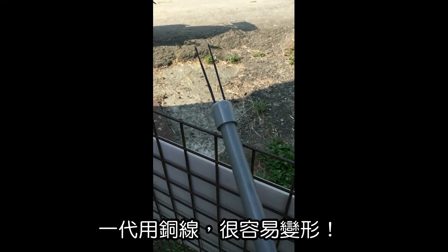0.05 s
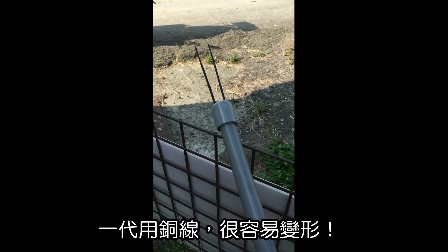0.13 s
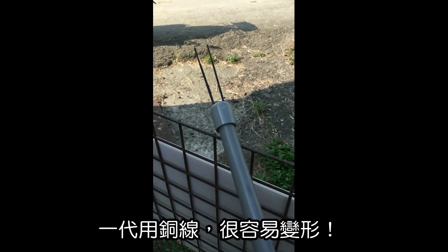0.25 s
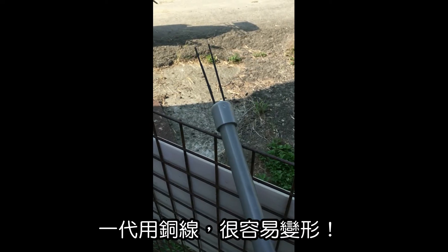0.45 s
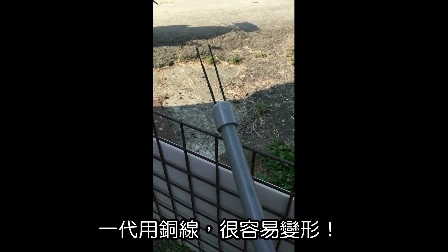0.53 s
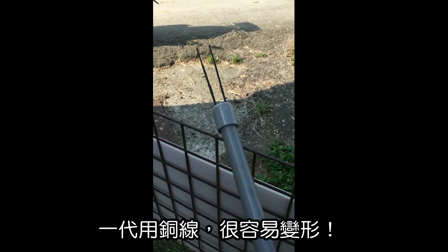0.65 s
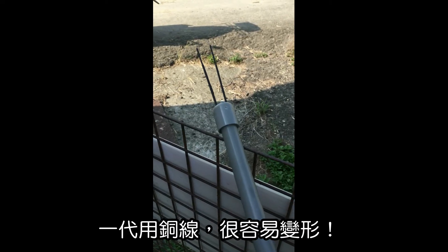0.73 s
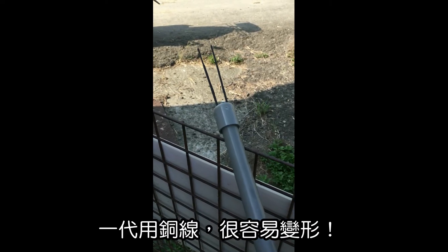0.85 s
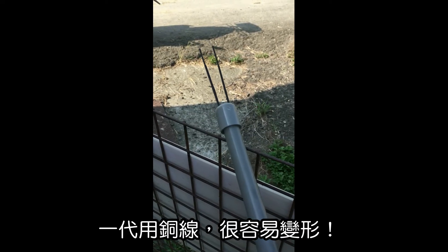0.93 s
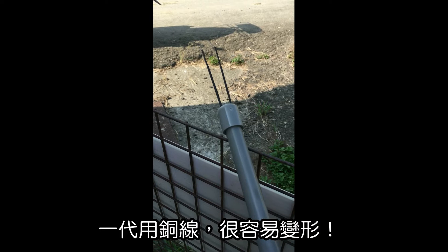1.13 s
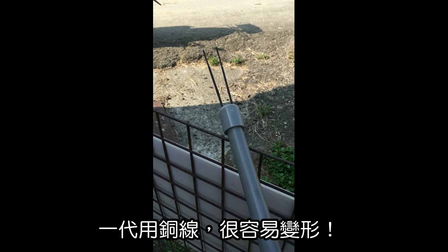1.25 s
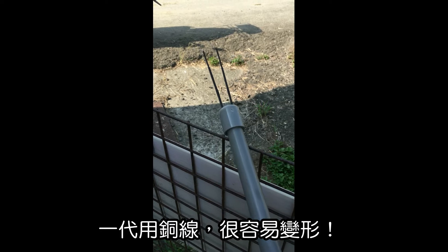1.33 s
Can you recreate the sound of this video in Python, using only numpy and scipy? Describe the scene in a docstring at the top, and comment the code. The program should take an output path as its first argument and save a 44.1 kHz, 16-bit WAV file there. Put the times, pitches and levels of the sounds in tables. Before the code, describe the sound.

Rapid electric sparks snap between the prongs of a handheld prod, loud and close enough to overload the microphone. The brief buzz stops, and light wind outdoors, faint rustling and one soft, low thud on the grip follow.

```python
"""High-voltage prod, outdoors

An arc crosses two prongs for half a second, close to the microphone. Sparks jump in bursts of two to
four, about 22 bursts a second: each a sharp crack with a low thump that overloads the microphone.
Cracks leave a short bright tail. Wind rumbles, two faint rustles follow, the hand bumps the grip once."""
import sys
import numpy as np
from scipy.fft import rfft, irfft, next_fast_len
from scipy.io import wavfile

SR = 44100
rng = np.random.default_rng(int(sys.argv[2]) if len(sys.argv) > 2 else 0)


def unload_wav(signal):
    """Save mono or channel-first audio to the path in sys.argv[1] as 16-bit WAV at rate SR, clipped to [-1, 1]."""
    wavfile.write(
        sys.argv[1],
        SR,
        np.round(np.clip(np.atleast_2d(signal).T, -1, 1) * 32767).astype(np.int16),
    )


N = 61739

# Sparks: t/s, relative crack level/dB, thump strength (+ push, - pull)
SPARK_EVENTS = [(0.1883, -30.5, -0.5), (0.1981, -25.5, -1.5), (0.2116, -3, -75.5), (0.2211, 1.5, 98.5),
                (0.2335, 0, -50), (.2560, 1, 57), (0.2655, 1, 11.5), (0.2869, -0.5, -36.5),
                (0.2966, -0.5, 50), (0.306, -1.1, -4), (.3173, -0.4, -75), (0.342, 1.6, 11),
                (.3515, 1.5, 25.5), (0.3623, -0.5, -43), (0.3862, 3.9, 0.5), (0.3967, 0, 8.5),
                (.4098, -0.5, -22), (0.4364, 2, 42), (0.4447, -1, -73), (0.4763, 0.5, 68),
                (0.4845, 5.5, -81), (.4942, -0.5, 55), (.5229, -0.4, -100), (0.5314, 1.5, 32),
                (0.5409, -1.5, 13.5), (0.5662, -0.8, -1.5), (.5752, -1.5, 81.5), (0.585, 0.5, -91.5),
                (.6120, 3.5, 34.5), (0.6221, 0, -70), (.6546, 3, 47), (.6635, -3, 45.5)]
# Crack spectrum: f/Hz, level/dB
CRACK_SPECTRUM = [(40, 7.5), (130, 18.5), (400, 17.5), (800, 17.5), (1400, 14.5), (2300, 13.5),
                  (3300, 11.5), (4800, 9), (5900, 13), (8200, 6), (10400, -11), (12900, 5), (15800, -13.5)]
# Sizzle of the charged air: f/Hz, level/dB
SIZZLE_SPECTRUM = [(300, 1.5), (1500, -2.5), (2850, -2.5), (3150, -3), (3500, -8), (7000, -4), (10500, -8),
                   (13000, -8.5), (15800, -9.5)]
# Ignition sputter: f/Hz, level/dB
SPUTTER_SPECTRUM = [(60, -13), (160, 0.5), (350, -1), (680, -9), (850, -25), (2000, -21), (6000, -58.5)]
# Echoes off nearby surfaces: delay/s, treble level/dB
ECHO_TAPS = [(.00315, -24), (.00656, -20)]
# Short bright tail after each crack, with a thin ring near 3.2 kHz: f/Hz, level/dB
TAIL_SPECTRUM = [(100, -1.5), (500, 0.5), (2800, -8), (3160, 8), (3600, -1), (7000, -4.5), (10500, 15.5),
                 (12900, 2.5), (15500, 4)]
# Microphone dips: f/Hz, width/Hz, depth (0-1)
MIC_DIPS = [(799, 170, 0.4), (2815, 330, 0.4)]
# Rustle peaks: t/s, level/dB
RUSTLE_PEAKS = [(1.08, -60), (1.18, -71)]
# Rustle spectrum: f/Hz, level/dB
RUSTLE_SPECTRUM = [(500, -25), (1500, -10.5), (2050, 3), (2800, -14), (3600, -6), (4200, -15), (5100, -20),
                   (5800, -18), (6800, -39)]
# Wind rumble: f/Hz, level/dB
WIND_SPECTRUM = [(20, -21), (45, -7.5), (68, 3.5), (110, -9.5), (180, -11.5), (300, -33.5), (700, -47),
                 (2000, -93)]
# Wind gusts: t/s, level/dB
WIND_ENVELOPE = [(0, -47), (.08, -49), (0.121, -40.5), (0.181, -45), (.7, -56), (.76, -42.5), (0.801, -52),
                 (.845, -81), (0.876, -39), (0.959, -42), (1.002, -54.5), (1.1, -46), (1.2, -57),
                 (1.34, -48), (1.39, -40)]
# Distant hush: f/Hz, level/dB
HUSH_SPECTRUM = [(100, -0.5), (300, -3.5), (600, -4.5), (1200, -9), (2300, -14.5), (4000, -28.5),
                 (7000, -42.5), (15000, -43.5)]
# Hush over time: t/s, level/dB
HUSH_ENVELOPE = [(0, -58.5), (0.031, -56), (0.04, -50), (.18, -53), (.7, -70.5), (.83, -68.5), (.95, -66),
                 (1.03, -60), (1.13, -60.5), (1.25, -56), (1.4, -56)]
# Microphone self-noise: f/Hz, level/dB
HISS_SPECTRUM = [(500, 3), (4000, -0.5), (9000, -5.5), (16000, -16.5)]


def sparks(crack_db=1, tint_sd_db=1.5, thump_corner_hz=128.5, thump_top_hz=734):
    """Each spark is one pressure impulse: a crack of varying colour plus a low push or pull."""
    size, lead = 8192, 256  # samples: window, room before the spark
    hz = np.fft.rfftfreq(size, 1 / SR)
    response, mic = echoes_and_tail(hz), microphone(hz)
    knots_hz = np.linspace(0, SR / 2, 9)
    fade = np.clip(2 * np.linspace(1, -1, size) + 1, 0, 1)
    thump = 1 / (1 + 1j * hz / thump_corner_hz) / (1 + (hz / thump_top_hz) ** 16)
    out = np.zeros(N + size)
    for at_s, level_db, push in SPARK_EVENTS:
        tint_db = np.interp(hz, knots_hz, tint_sd_db * rng.standard_normal(len(knots_hz)))
        crack = minimum_phase(log_interp(CRACK_SPECTRUM, hz) + tint_db) * amp(crack_db + level_db)
        pulse = irfft((crack * response + push * thump) * mic)
        start = round(at_s * SR) - lead
        out[start:start + size] += fade * np.roll(pulse, lead)
    return out[:N]


def sizzle(on_s=0.207, off_s=0.672, level_db=-41.5, rise_db_per_s=1299, fall_db_per_s=908):
    """Air sizzles steadily while the prongs are charged."""
    t = np.arange(N) / SR
    ramps_db = np.minimum((t - on_s) * rise_db_per_s, (off_s - t) * fall_db_per_s)
    gate = amp(np.minimum(0, ramps_db))
    return gate * noise(SIZZLE_SPECTRUM, [(0, level_db)])


def sputter():
    """Low sputter as the arc ignites."""
    return swell(SPUTTER_SPECTRUM, peak_s=0.22, peak_db=-16.5, fade_db_per_s=752.5)


def echoes_and_tail(hz, tail_db=-17, t60_s=0.054, echo_highpass_hz=6000):
    """Direct path, two bright echoes and a short bright tail with a thin ring near 3.2 kHz."""
    t = np.arange(2 * len(hz) - 2) / SR
    decay = rng.standard_normal(len(t)) * amp(-60 * t / t60_s)
    tail = rfft(decay / np.linalg.norm(decay)) * amp(tail_db + log_interp(TAIL_SPECTRUM, hz))
    echoes = sum(amp(db) * np.exp(-2j * np.pi * hz * delay_s) for delay_s, db in ECHO_TAPS)
    return 1 + tail + echoes * 1j * hz / (echo_highpass_hz + 1j * hz)


def microphone(hz, resonance_hz=58.3, q=1.87, bass_lag_hz=320.6, treble_lag_hz=8120):
    """Resonant high-pass with two dips. Lows lag highs, so impulses chirp downward."""
    s = 1j * hz
    response = s * s / (s * s + s * resonance_hz / q + resonance_hz ** 2)
    for centre_hz, width_hz, depth in MIC_DIPS:
        response *= 1 - depth * s * width_hz / (s * s + s * width_hz + centre_hz ** 2)
    bass_allpass = ((bass_lag_hz - s) / (bass_lag_hz + s)) ** 3
    treble_allpass = (treble_lag_hz - s) / (treble_lag_hz + s)
    return response * bass_allpass * treble_allpass


def hand_bump(at_s=1.374, gain_db=12.5, rolloff_hz=446):
    """Soft push on the grip; the microphone turns it into a low, falling thud."""
    hz = grid_hz()
    push = amp(gain_db) * np.exp(-(hz / rolloff_hz) ** 2)
    delay = np.exp(-2j * np.pi * hz * at_s)
    return irfft(push * delay * microphone(hz))[:N]


def rustles():
    """Brief, faint rustles after the arc."""
    return sum(swell(RUSTLE_SPECTRUM, at_s, db, fade_db_per_s=233.5) for at_s, db in RUSTLE_PEAKS)


def background(hiss_db=-76.5):
    """Light wind on the microphone, distant hush, self-noise."""
    wind = noise(WIND_SPECTRUM, WIND_ENVELOPE)
    hush = noise(HUSH_SPECTRUM, HUSH_ENVELOPE)
    hiss = noise(HISS_SPECTRUM, [(0, hiss_db)])
    return wind + hush + hiss


def swell(spectrum, peak_s, peak_db, fade_db_per_s):
    """Noise rising to a peak and falling at the same rate."""
    envelope = [(t, peak_db - fade_db_per_s * abs(t - peak_s)) for t in (0, peak_s, N / SR)]
    return noise(spectrum, envelope)


def noise(spectrum, envelope):
    """Coloured noise; the envelope (t/s, level/dB) sets its RMS."""
    hz = grid_hz()
    white = rng.standard_normal(2 * len(hz) - 2)
    coloured = irfft(rfft(white) * amp(log_interp(spectrum, hz)))[:N]
    level_db = np.interp(np.arange(N) / SR, *np.transpose(envelope))
    return coloured / coloured.std() * amp(level_db)


def minimum_phase(level_db):
    """Fastest causal response with this magnitude."""
    cepstrum = irfft(level_db * np.log(10) / 20)
    half = len(cepstrum) // 2
    return np.exp(rfft(np.r_[cepstrum[0], 2 * cepstrum[1:half], np.zeros(half)]))


def log_interp(spectrum, hz):
    """Levels in dB, interpolated over log frequency."""
    knots_hz, level_db = np.transpose(spectrum)
    return np.interp(np.log(hz + 1), np.log(knots_hz + 1), level_db)


def grid_hz():
    """FFT bins for about twice the scene length."""
    return np.fft.rfftfreq(2 * next_fast_len(N), 1 / SR)


def amp(db):
    """dB to gain."""
    return 10 ** (np.asarray(db) / 20)


def scene():
    """Discharge, background and handling; mono."""
    return (sparks() + sizzle() + sputter() + background() + rustles() + hand_bump())[None]


def record(dry, ceiling=0.61, knee_order=6, cutoff_hz=16100):
    """Input overload: soft clip, then a steep low-pass."""
    hz = grid_hz()
    clipped = dry / (1 + np.abs(dry / ceiling) ** knee_order) ** (1 / knee_order)
    lowpass = 1 / (1 + (hz / cutoff_hz) ** 80)
    return irfft(rfft(clipped, 2 * len(hz) - 2) * lowpass)[:, :N]


dry = scene()
out = record(dry)
unload_wav(out)
```